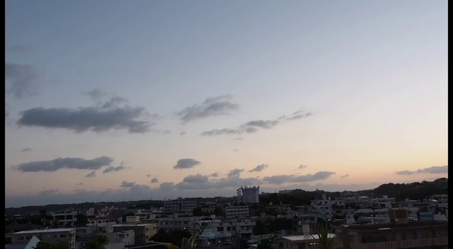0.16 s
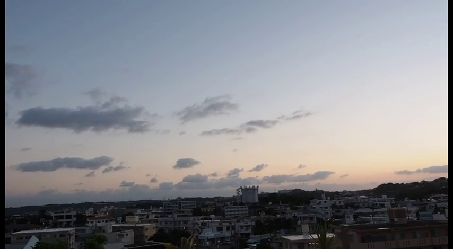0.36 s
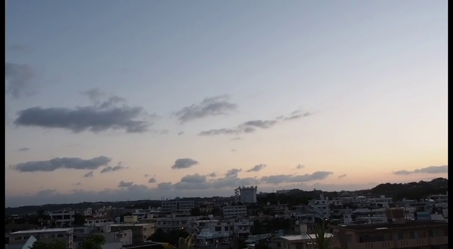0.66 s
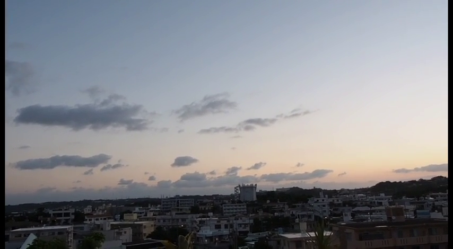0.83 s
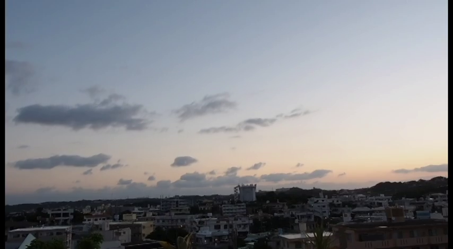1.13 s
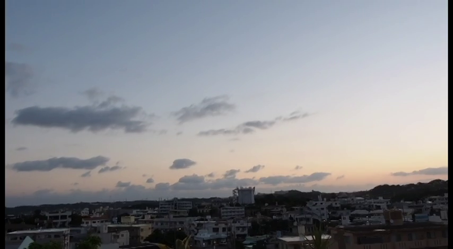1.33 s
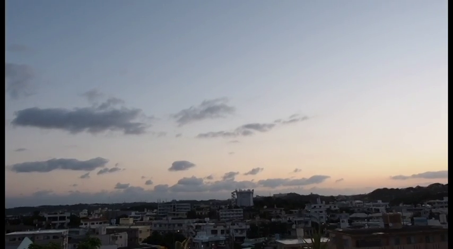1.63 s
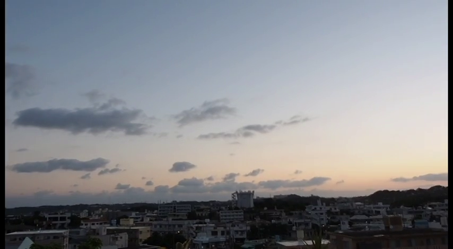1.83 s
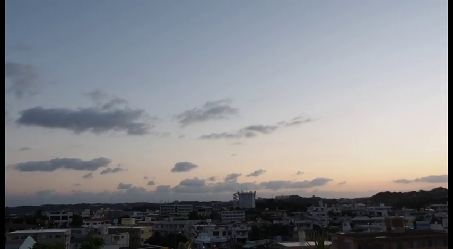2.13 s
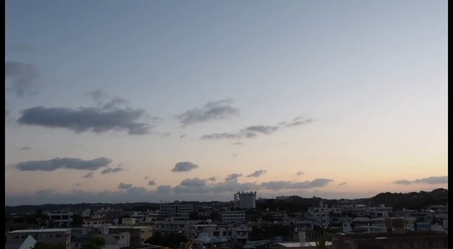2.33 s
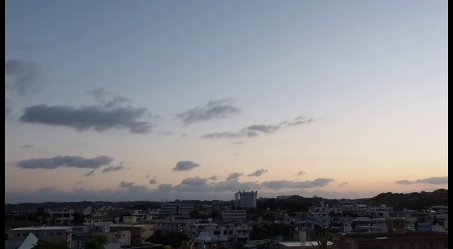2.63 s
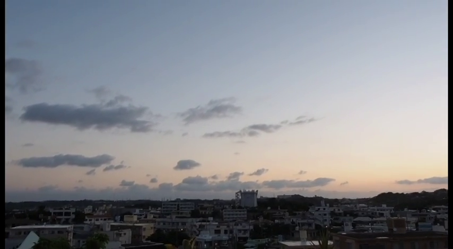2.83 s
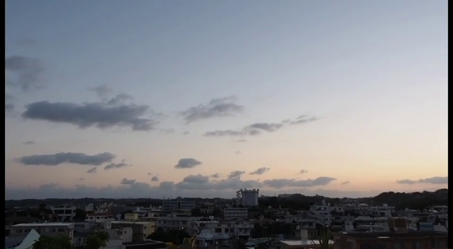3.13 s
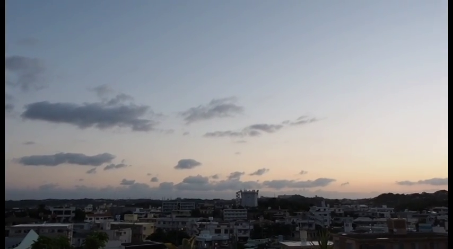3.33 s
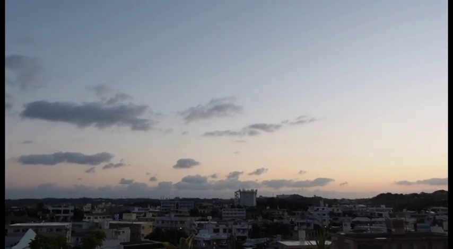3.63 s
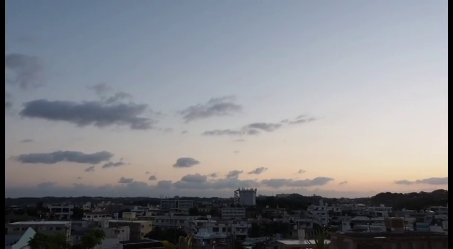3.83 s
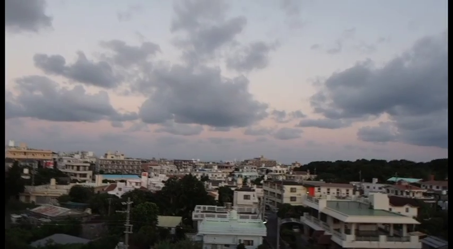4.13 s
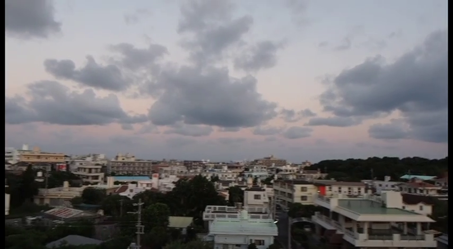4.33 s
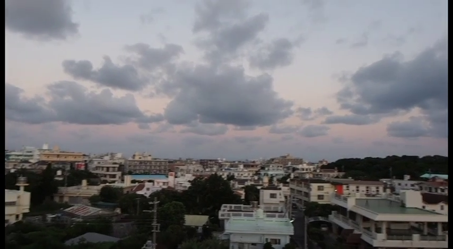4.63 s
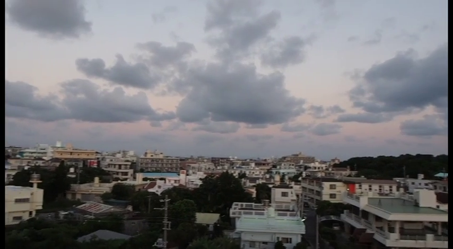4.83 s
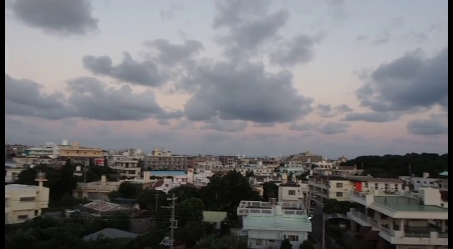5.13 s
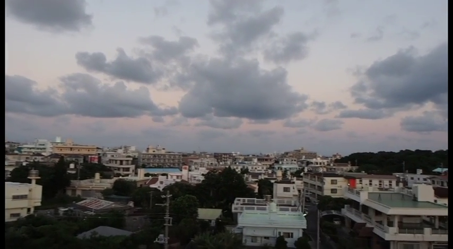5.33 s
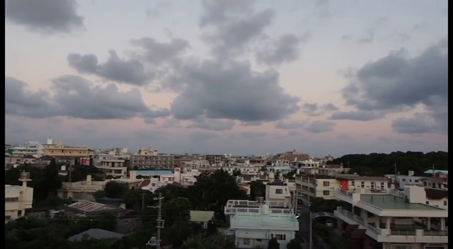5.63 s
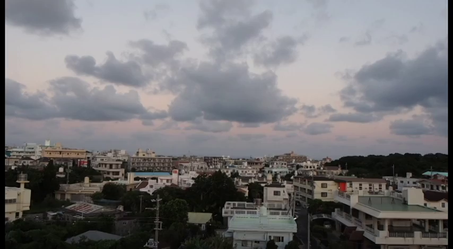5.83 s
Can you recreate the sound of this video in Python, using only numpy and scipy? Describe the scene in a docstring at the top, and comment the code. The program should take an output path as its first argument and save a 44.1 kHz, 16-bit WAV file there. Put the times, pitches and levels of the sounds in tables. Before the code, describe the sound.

Dawn birdsong with soft echoes above distant traffic, cut by a split-second dropout, then louder chirps, raspy chips and heavy wind buffeting.

```python
"""Dawn above a town, heard from two lookouts one after the other.
First, songbirds whistle, slur, trill and chip as bending tones and rasping noise, echoed by house fronts,
over a haze of far birds and rumbling traffic; puffs of wind buffet the two ports in the opening second and a half.
At 4.0 s the sound cuts to a short silence, then the second lookout brings more calls over its own traffic.
From 4.4 s shaped bass noise makes new puffs of wind, strongest near the end; faint hiss lies under both views."""
import sys
import numpy as np
from scipy import signal
from scipy.fft import rfft, irfft, next_fast_len
from scipy.io import wavfile
from scipy.ndimage import uniform_filter1d

SR = 44100
rng = np.random.default_rng(int(sys.argv[2]) if len(sys.argv) > 2 else 0)


def to_wav(s):
    """Save 16-bit WAV."""
    ch = np.atleast_2d(s).T  # columns
    pcm = np.round(np.clip(ch, -1, 1) * 32767)  # PCM
    wavfile.write(sys.argv[1], SR, pcm.astype(np.int16))


N = 263277
TIME = np.arange(N) / SR

# In the bird tables, levels come before the group trims in scene(), and pan is left minus right.
# Held notes: (time [s], length [s], pitch [Hz], level [dB], pan [dB], quaver [0-1])
HELD_NOTES = [(0.535, 0.027, 2223, -58.5, 10, 0), (0.755, 0.03, 2190, -59.5, -1, 0),
              (1.5, 0.025, 2620, -58, -3, 0.96), (2.222, 0.043, 2310, -46, -2, 0.2),
              (2.35, 0.038, 2530, -55, -4, 0.9), (2.49, 0.038, 2640, -59, -1.5, 1),
              (3.41, 0.064, 6480, -69.5, 1.5, 0), (3.64, 0.11, 5600, -66, 9, .5),
              (3.075, 0.045, 5500, -65, 2.5, 0), (4.138, 0.031, 1290, -55, 1, 1),
              (4.406, 0.065, 3000, -51, 12, 0.5), (4.783, 0.066, 2160, -53.5, 4, 0.2),
              (4.872, 0.043, 2570, -54, 7, 0.9), (4.93, 0.064, 3480, -51.5, -6.5, 0.1),
              (4.972, 0.017, 3083, -45.5, -7, 0.2), (5.2, 0.037, 2174, -52.5, -8, 0.1),
              (5.313, 0.013, 2260, -48, -6, 0), (5.366, 0.011, 3010, -47.5, 1, 0),
              (5.473, 0.069, 2750, -54.5, -8, 1), (5.604, 0.035, 3320, -40, 1.5, 0),
              (5.636, 0.0397, 3370, -40.5, 2.5, 0.1), (5.85, 0.06, 3100, -55, 10, 0),
              (5.882, 0.047, 2232, -45, -1.5, 0.2)]
# Short notes that dip and level off: (time [s], length [s], pitch [Hz], level [dB], pan [dB])
SCOOPED_NOTES = [(0.172, 0.017, 2340, -55.5, 12), (0.728, 0.032, 2660, -60, 1),
                 (1.004, 0.017, 2467, -52, -2), (1.411, 0.013, 2760, -45.5, -0.5),
                 (1.705, 0.028, 2320, -54, -3), (2.08, 0.039, 2180, -58, 4), (2.148, 0.04, 2326, -54.5, -3),
                 (2.522, 0.029, 2120, -57.5, -1), (3.7, 0.03, 2600, -55.5, 3), (3.77, 0.029, 2490, -57, 1),
                 (4.12, 0.013, 2374, -51.5, 9), (4.205, 0.01, 2320, -57, -2), (4.31, 0.018, 2460, -57, 0),
                 (4.371, 0.012, 2310, -47.5, -5), (5.649, 0.035, 2280, -47, -7.5),
                 (5.956, 0.018, 2470, -47, -2)]
# Falling notes: (time [s], length [s], pitch [Hz], level [dB], pan [dB])
FALLING_NOTES = [(0.025, 0.022, 2920, -54.5, 6.5), (0.508, 0.033, 2700, -55.5, 8),
                 (1.155, 0.026, 2400, -57, 0), (1.463, 0.024, 2715, -56, -3),
                 (2.008, 0.021, 2950, -52.5, -3), (2.3, 0.028, 2570, -50, 1), (2.572, 0.077, 5170, -61, 7),
                 (3.025, 0.045, 6350, -73, 1.5), (3.375, 0.025, 2890, -57, 7),
                 (3.445, 0.07, 4980, -63, 5.5), (4.252, 0.0238, 4620, -54.5, -10),
                 (4.343, 0.014, 2380, -50, -7), (4.948, 0.018, 2420, -49, -3),
                 (5.278, 0.033, 2290, -50, -9), (5.586, 0.017, 2920, -48, -2),
                 (5.93, 0.022, 1695, -52.5, -1)]
# Rising notes: (time [s], length [s], pitch [Hz], level [dB], pan [dB], quaver [0-1])
RISING_NOTES = [(0.718, 0.009, 2250, -50, 1, 0.06), (1.04, 0.059, 4000, -66, 4, 0.1),
                (1.652, 0.05, 1930, -52.5, -1, 0), (2.69, 0.038, 7000, -70, -1.5, 0),
                (4.172, 0.043, 4130, -47.5, -4.5, 0), (4.215, 0.04, 4720, -56, -8.5, 0),
                (4.605, 0.049, 3980, -56, -4, 0), (5.093, 0.1, 3980, -54, -3.5, .5),
                (5.585, 0.095, 3890, -50.5, -3.5, 1)]
# The commonest call, a held note and then a quick drop that either levels off or plunges on:
# (time [s], hold [s], held pitch [Hz], drop pitch [Hz], held level [dB], drop level [dB],
#  pan [dB], quaver [0-1], plunge [0-1])
DROPPING_CALLS = [(0.426, 0.04, 3050, 2770, -53.5, -49, 5.5, 0.8, 0.94),
                  (0.655, 0.04, 3060, 2480, -59, -55, 0.5, 0.8, 0),
                  (1.95, 0.035, 3410, 2790, -44.5, -48, -2, 0, 0.9),
                  (2.416, 0.047, 3090, 2490, -53.5, -55, 0, 1, 0),
                  (2.571, 0.03, 3230, 2790, -48, -50, -1.5, 0, 1),
                  (2.694, 0.048, 3176, 2333, -49.5, -45, -2, 0.95, 0.27),
                  (4.509, 0.056, 3040, 2440, -51.5, -54, 5.5, 0.8, 0.1),
                  (4.656, 0.042, 2836, 2790, -48.5, -46, -6, 1, 0.23),
                  (4.926, 0.039, 3110, 2530, -47, -45, -4.5, 0, 0.2),
                  (5.307, 0.03, 3104, 2890, -48, -43.5, 0.5, 1, 1)]
# Harsh chips, before stretch and trim: (time [s], length [s], upper edge [Hz], level [dB])
HARSH_CHIPS = [(0.645, 0.04, 6800, -63), (0.947, 0.041, 6000, -58), (3.087, 0.081, 5570, -62),
               (3.317, 0.031, 6400, -60), (4.11, 0.063, 5800, -53), (4.269, 0.088, 4930, -54),
               (4.527, 0.018, 5570, -52.5), (4.602, 0.047, 7800, -59), (4.883, 0.03, 5660, -50.5),
               (5.05, 0.027, 7600, -63), (5.269, 0.055, 6000, -50), (5.296, 0.049, 8600, -53.5),
               (5.563, 0.027, 8600, -60), (5.655, 0.027, 8800, -57), (5.783, 0.02, 8800, -56),
               (5.788, 0.038, 4430, -48), (5.894, 0.028, 8000, -57)]
# How the far birds swell and fade together: (time [s], level change [dB])
CHORUS_SWELL = [(0, -0.5), (1.4, 1.5), (2.3, 2), (2.95, -1), (3.9, 0.5), (4.2, 4), (4.7, 2), (5.9, 1.5)]
# Four spells of wind, one curve each, before trim: (time [s], level [dB], left minus right [dB])
WIND_SPELLS = [
    [(0.0, -47, -1), (0.038, -48, 0.0), (0.062, -39.5, 11), (0.158, -50, 0.5), (0.208, -51.5, 4),
     (0.446, -48, 0), (0.518, -46.5, 13), (0.548, -56, -0.5), (0.606, -39.5, 18), (0.686, -48.5, 0),
     (0.742, -45.5, 5.0), (0.77, -45, 0.0)],
    [(0.77, -60, 3), (0.804, -38.5, 25), (0.948, -48, 5.5), (0.982, -51, 14), (1.048, -44.5, 10),
     (1.154, -52, -1.0), (1.218, -48, 15), (1.232, -38.5, 19), (1.336, -36.5, 16.5), (1.36, -49, 2),
     (1.446, -43, 14.5), (1.52, -51, 4)],
    [(4.38, -53, 3.5), (4.42, -45, -15), (4.642, -48, -2), (4.67, -33, 1), (4.712, -37.5, -22),
     (4.796, -36, 0), (4.866, -35, -7.0), (4.932, -43.5, -2), (5.028, -36.5, -5), (5.17, -42, 1),
     (5.266, -36, 9), (5.35, -61, -1.5)],
    [(5.35, -56, -5), (5.4, -41.5, 17), (5.54, -49, -3), (5.618, -55, 1), (5.646, -48, -11),
     (5.7, -33.5, 12.5), (5.746, -43.5, 4.0), (5.786, -37, 18), (5.84, -27, 25), (5.894, -40, 26),
     (5.916, -30, 30), (5.97, -38, 13)],
]
# The town from each lookout: (frequency [Hz], level [dB per Hz])
FIRST_TOWN = [(20, -89.5), (42, -77.5), (85, -68.5), (125, -74.5), (200, -73), (260, -78), (370, -78.5),
              (500, -82.5), (970, -80), (1350, -87.5), (2000, -86.5), (3150, -89), (3700, -91), (5000, -98),
              (6800, -109), (15000, -125)]
SECOND_TOWN = [(20, -92), (45, -65), (90, -69.5), (200, -71), (260, -76.5), (380, -76), (500, -83),
               (970, -80.5), (1200, -89), (1600, -85.5), (2000, -88), (3150, -85.5), (3700, -87),
               (5000, -94), (6800, -107), (15000, -125)]
# Likeness of the two ports for sound from all round: (frequency [Hz], correlation [-1 to 1])
PORT_LIKENESS = [(60, 0.92), (200, 0.87), (640, 0.63), (1400, 0.53), (2400, -0.29), (4200, -0.36),
                 (7000, 0.28), (12000, 0.75)]
# Recorder hiss: (frequency [Hz], level [dB per Hz])
HISS_SPECTRUM = [(1000, -106), (6800, -106), (8000, -102), (10000, -103.3), (12500, -102.6), (15500, -103)]

# Pitch at the start, middle and end of each kind of note, as a multiple of its own pitch
HELD, SCOOPED, FALLING, RISING = (1.015, 1, 0.97), (1.08, 1, 1.025), (1.09, 0.99, 0.77), (.87, 1, 1.075)
DROP_S = 0.019  # length of the drop that ends a call
# Unsteadiness of a note at an unrest of 1: share of its pitch, dB of its level
WAVER, FLUTTER_DB = .014, 3.2
# A full quaver: share of the pitch, depth of the throb in level (0-1)
QUAVER, THROB = .026, .4
# A bird to one side reaches that port earlier: longest lead, and the pan at which it levels off
LEAD_MS, LEAD_PAN_DB = 0.15, 7
CHIP_LOW_HZ, CHIP_PAN_DB = 3940, 5  # lower edge of every chip; scatter of their directions
SILENCE_START_S, SILENCE_END_S = 4.002, 4.122
HISS_PAN_DB, TOP_HZ = 1.5, 15800


def undb(db):
    """Decibels to gain."""
    return 10 ** (np.asarray(db) / 20)


def unit(x):
    """Scale to rms 1."""
    return x / np.sqrt(np.mean(x ** 2) + 1e-18)


def on_bins(points, size=N):
    """A (Hz, value) table on the bins of a spectrum, joined on a log axis."""
    hz, value = np.transpose(points)
    return np.interp(np.log(np.fft.rfftfreq(size, 1 / SR) + 1), np.log(hz), value)


def coloured(points):
    """Two unrelated noises with a given density in dB per Hz."""
    white = rfft(rng.standard_normal((2, N)))
    return irfft(white * undb(on_bins(points)) * np.sqrt(SR / 2), N)


def band_noise(size, low_hz, high_hz, order=2):
    """Two unrelated noises between two soft edges, rms 1."""
    hz = np.fft.rfftfreq(size, 1 / SR) + 1
    low_edge = 1 + (low_hz / hz) ** (2 * order)
    high_edge = 1 + (hz / high_hz) ** (2 * order)
    white = rfft(rng.standard_normal((2, size)))
    return unit(irfft(white * (low_edge * high_edge) ** -.5, size))


def walk(size, rate):
    """A random wander of spread near 1 that takes a new target `rate` times a second."""
    steps = np.arange(size) / SR * rate
    targets = rng.standard_normal(size // 20 + 2)
    return np.interp(steps, np.arange(len(targets)), targets)


def add(out, start_s, sound):
    """Mix a stereo sound in at a time."""
    i = int(start_s * SR)
    lo, hi = max(i, 0), min(i + sound.shape[1], N)
    if hi > lo:
        out[:, lo:hi] += sound[:, lo - i:hi - i]


def ports(db, pan_db):
    """Gains of the left and right port."""
    return undb(db + np.array([[pan_db], [-pan_db]]) / 2)


def note(length, pitches_hz, lead_ms, trilled=0, quaver_rate=84, attack_s=0.0029, release_s=0.0043,
         overtone_db=-32):
    """One syrinx tone bending through three pitches; a trilled one quavers in pitch and level."""
    t = np.arange(int((length + attack_s) * SR)) / SR
    hz = np.polyval(np.polyfit([0, .5, 1], pitches_hz, 2), t / t[-1])
    # held notes are steadier than slurs
    unrest = np.clip(0.48 + 3 * np.ptp(np.log(pitches_hz)), 0, 1.2)
    wandering_rate = quaver_rate * (1 + 0.095 * walk(len(t), 60))
    quaver = trilled * np.sin(2 * np.pi * np.cumsum(wandering_rate) / SR)
    hz = hz * (1 + unrest * WAVER * walk(len(t), 284) + QUAVER * quaver)
    # half the lead goes to each port, in seconds
    lead = np.array([[lead_ms], [-lead_ms]]) / 2000
    phase = 2 * np.pi * (np.cumsum(hz) / SR + hz * lead)
    edges = np.clip(np.minimum(t / attack_s, (t[-1] - t) / release_s), 0, 1)
    swell = np.sin(np.pi / 2 * edges) ** 2
    # the throat is tuned to the middle of the note, so the ends of a slur are weaker
    throat = 1 / np.hypot(1, np.log(hz / pitches_hz[1]) / 0.13)
    flutter = undb(unrest * FLUTTER_DB * walk(len(t), 166))
    loudness = unit(swell * throat * (1 + THROB * quaver) * flutter)
    return loudness * np.sqrt(2) * (np.sin(phase) + undb(overtone_db) * np.sin(2 * phase))


def bird(length, pitch_hz, shape, db, pan_db, quaver=0):
    """One note of a given shape, louder and earlier at the port nearer the bird."""
    lead_ms = LEAD_MS * np.tanh(pan_db / LEAD_PAN_DB)
    tone = note(max(length, .005), pitch_hz * np.array(shape), lead_ms, np.clip(quaver, 0, 1.3))
    return ports(db, pan_db) * tone


def single_notes(table, shape):
    """Sing a table of syrinx notes that share one pitch shape."""
    out = np.zeros((2, N))
    for start_s, length, pitch_hz, *delivery in table:
        add(out, start_s, bird(length, pitch_hz, shape, *delivery))
    return out


def dropping_calls():
    """Each bird holds a note, then slurs down the moment it lets go."""
    out = np.zeros((2, N))
    for start_s, hold_s, held_hz, drop_hz, held_db, drop_db, pan_db, quaver, plunge in DROPPING_CALLS:
        drop = (1 - plunge) * np.array(SCOOPED) + plunge * np.array(FALLING)
        add(out, start_s, bird(hold_s, held_hz, HELD, held_db, pan_db, quaver))
        add(out, start_s + hold_s, bird(DROP_S, drop_hz, drop, drop_db, pan_db))
    return out


def chips(rasp_rate=170, rasp_db=3.0, stretch=1.1, trim_db=-4.5):
    """Harsh calls: a chaotic syrinx gives a short band of rasping noise."""
    out = np.zeros((2, N))
    pans_db = CHIP_PAN_DB * rng.standard_normal(len(HARSH_CHIPS))
    for (start_s, length, high_hz, db), pan_db in zip(HARSH_CHIPS, pans_db):
        size = int(max(length, .005) * stretch * SR)
        noise = band_noise(size, CHIP_LOW_HZ, high_hz, order=7)
        rasp = noise * undb(rasp_db * walk(size, rasp_rate)) * np.hanning(size)
        # stretched evenly about its middle
        add(out, start_s - length * (stretch - 1) / 2, ports(db + trim_db, pan_db) * unit(rasp))
    return out


def near_walls(x, wall_db, reach_s=0.032, count=6):
    """A few early reflections from parapets and roofs break up each slur."""
    out = np.zeros((2, N))
    for port in range(2):
        for lag in (SR * (.004 + reach_s * rng.random(count))).astype(int):
            out[port, lag:] += x[port, :-lag] * rng.choice([-1, 1])
    return undb(wall_db) * out / np.sqrt(count)


def house_fronts(x, wet_db, t60_s, first_s=.012, patchy_db=4, smear=1.15):
    """Scattered echoes from houses and trees: clumps of reflections that blur the pitch and die away."""
    t = np.arange(SR) / SR
    clumps = undb(patchy_db * walk(SR, 70.4)) * np.clip(t / first_s - .5, 0, 1)
    response = band_noise(SR, 800, 9600) * clumps * undb(-60 * t / t60_s)
    response /= np.sqrt(np.sum(response ** 2, axis=1, keepdims=True))
    # a wandering phase widens each tone, so the tail is a haze and does not ring
    analytic = signal.hilbert(x, next_fast_len(N))[:, :N]
    blurred = (analytic * np.exp(1j * smear * walk(N, 500))).real
    return undb(wet_db) * signal.fftconvolve(blurred, response, axes=1)[:, :N]


def far_wall(x, lag_s, db):
    """One building some thirty metres off sends each call back, with the sides swapped."""
    out = np.zeros((2, N))
    add(out, lag_s, undb(db) * x[::-1])
    return out


def far_birds(low_hz, high_hz, db, count, bend=0.0926, spread_db=3):
    """Many faint syrinx notes from all round, each with its own pitch, bend, lead and pan."""
    out = np.zeros((2, N))
    evens, normals = rng.random((count, 3)), rng.standard_normal((count, 5))
    for (when, pitch, long), (start_bend, end_bend, lead, level, pan) in zip(evens, normals):
        middle_hz = low_hz + (high_hz - low_hz) * pitch
        hz = middle_hz * (1 + bend * np.array([start_bend, 0, end_bend]))
        sound = note(0.01506 + .05 * long, hz, 0.078 * lead)
        add(out, when * N / SR, ports(db + spread_db * np.clip(level, -2, 1), 2 * pan) * sound)
    return out


def far_chorus():
    """Four pitch ranges of far birds swell together, with their echoes."""
    chorus = far_birds(2150, 3300, db=-62.0, count=130)
    chorus += far_birds(3700, 5200, db=-70.5, count=110, spread_db=1.0)
    chorus += far_birds(5200, 7000, db=-73.5, count=20)
    chorus += far_birds(1600, 2200, db=-62, count=14)
    chorus = chorus * undb(np.interp(TIME, *np.transpose(CHORUS_SWELL)))
    return 0.88 * chorus + house_fronts(chorus, wet_db=-1.0, t60_s=0.84)


def wind(low_hz=42, high_hz=125, fast_low_hz=78, fast_high_hz=155, strong_db=-35.0, strong_range_db=3,
         trim_db=2, fade_s=0.012, steady_s=0.064):
    """Eddies push on each port separately; the strongest puffs are faster and sit higher in pitch."""
    slow = band_noise(N, low_hz, high_hz, order=4)
    fast = band_noise(N, fast_low_hz, fast_high_hz, order=4)
    out = np.zeros((2, N))
    for spell in WIND_SPELLS:
        times_s, levels_db, pans_db = np.transpose(spell)
        db, pan_db = np.interp(TIME, times_s, levels_db), np.interp(TIME, times_s, pans_db)
        haste = (1 + np.tanh((db - strong_db) / strong_range_db)) / 2
        eddies = np.sqrt(1 - haste) * slow + np.sqrt(haste) * fast
        # even out the noise, so the flow alone sets how hard the eddies push
        eddies = eddies / np.sqrt(uniform_filter1d(eddies ** 2, int(steady_s * SR)) + 1e-9)
        # each spell fades in before its first point and out after its last
        blowing = np.clip(1 + np.minimum(TIME - times_s[0], times_s[-1] - TIME) / fade_s, 0, 1)
        sides = undb(np.array([pan_db, -pan_db]) / 2)
        sides = sides / np.sqrt(np.mean(sides ** 2, axis=0))
        out += eddies * blowing * undb(db + trim_db) * sides
    return out


def town(spectrum, pan_db):
    """Far traffic as a steady rumble of coloured noise; its bass is alike at both ports."""
    likeness = np.clip(on_bins(PORT_LIKENESS), -.95, .95)
    shares = np.sqrt(np.array([1 + likeness, 1 - likeness]) / 2)
    mid, side = rfft(coloured(spectrum)) * shares
    return irfft([mid + side, mid - side], N) * ports(0, pan_db)


def recorder_hiss():
    """Faint electronic hiss: noise unrelated between the ports, a little stronger on the left."""
    return coloured(HISS_SPECTRUM) * ports(0, HISS_PAN_DB)


def scene():
    """Birds, wind and town; the echoes and the town change from the first lookout to the second."""
    notes = single_notes(HELD_NOTES, HELD) + single_notes(SCOOPED_NOTES, SCOOPED)
    notes += single_notes(FALLING_NOTES, FALLING) + single_notes(RISING_NOTES, RISING)
    birds = undb(2.5) * notes + undb(1.5) * dropping_calls() + undb(-1.0) * chips()
    birds = birds + near_walls(birds, wall_db=-8.5)
    first = house_fronts(birds, wet_db=-9.5, t60_s=1.0) + far_wall(birds, lag_s=0.18, db=-18.5)
    first += town(FIRST_TOWN, pan_db=1.3)
    second = house_fronts(birds, wet_db=-12, t60_s=0.97) + town(SECOND_TOWN, pan_db=1.0)
    surroundings = np.where(TIME < SILENCE_START_S, first, second)
    return birds + far_chorus() + surroundings + wind()


def record(dry):
    """The recorder adds hiss, is silent between the two lookouts and cuts the top."""
    running = (TIME < SILENCE_START_S) | (TIME > SILENCE_END_S)
    sound = (dry + recorder_hiss()) * running
    top_cut = signal.ellip(10, .1, 70, TOP_HZ, fs=SR, output="sos")
    return signal.sosfilt(top_cut, sound)


dry = scene()
out = record(dry)
to_wav(out)
```